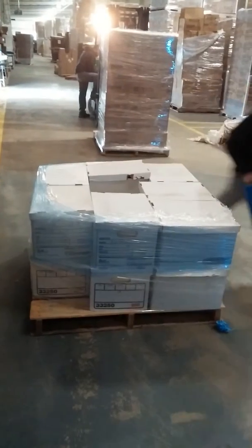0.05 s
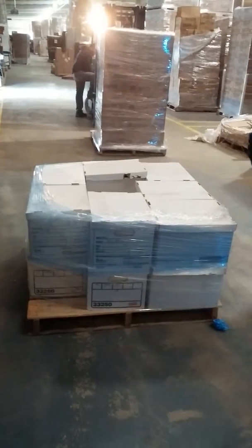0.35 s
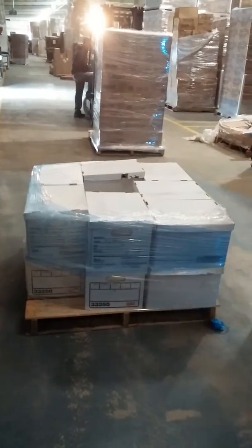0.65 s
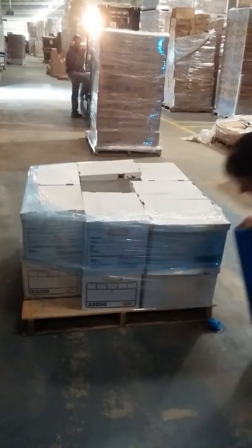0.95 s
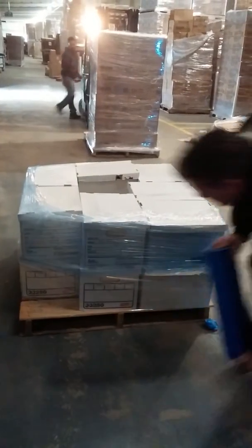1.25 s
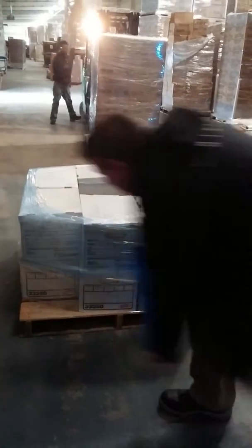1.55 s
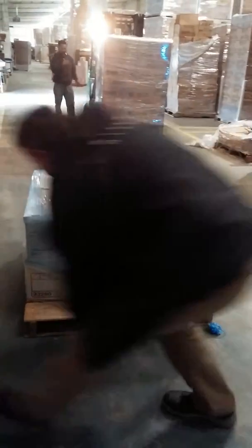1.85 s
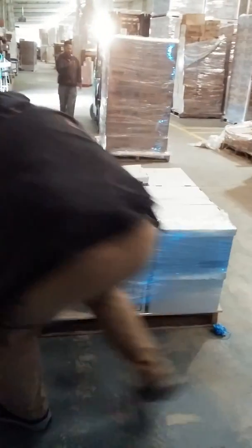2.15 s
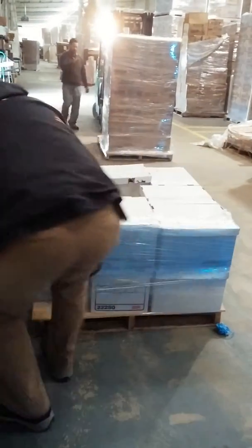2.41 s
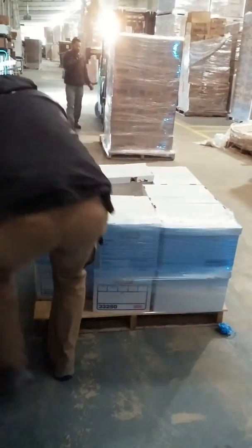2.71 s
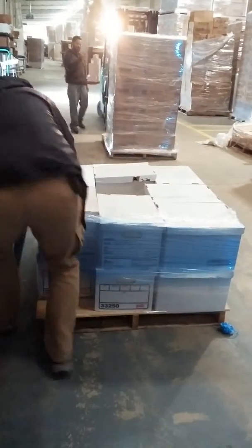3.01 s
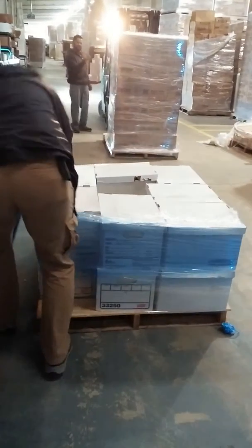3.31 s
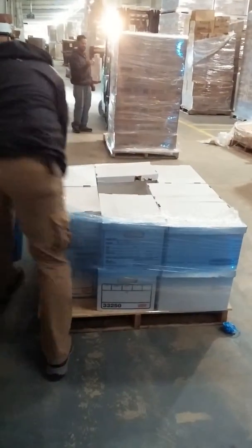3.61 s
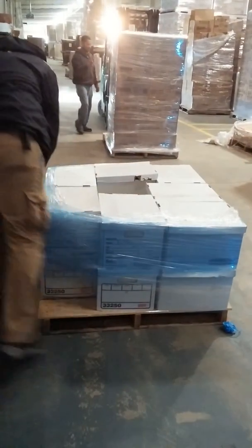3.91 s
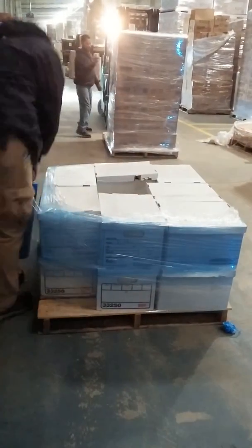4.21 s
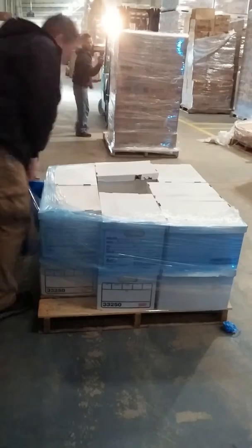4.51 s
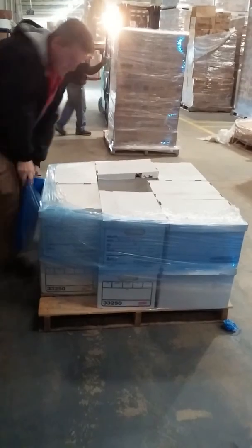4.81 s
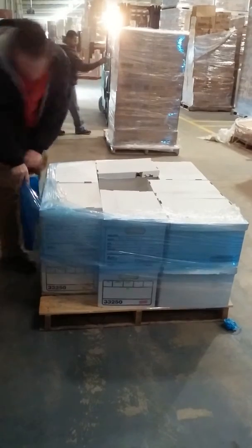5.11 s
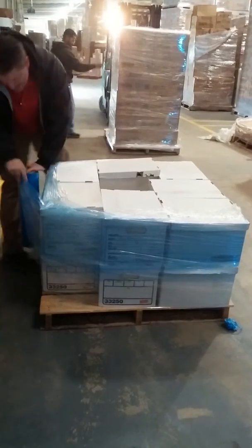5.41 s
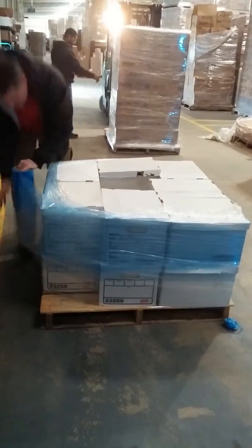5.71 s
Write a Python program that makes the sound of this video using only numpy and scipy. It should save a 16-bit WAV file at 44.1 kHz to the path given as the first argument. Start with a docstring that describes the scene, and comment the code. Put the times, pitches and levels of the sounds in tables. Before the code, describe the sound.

Plastic stretch film tears off a roll right from the start, a loud, dense, crackling rasp that swells and dips as it is drawn around boxes on a pallet. The taut sheet drums underneath, strongest from about 1.1 to 1.9 seconds, with a high squeak near 1.5. Soft boot thuds land on concrete at around 1.3, 2.2 and 2.7 seconds. The pull eases, then rises again near 2.9 with a cluster of rough, gliding squeaks and stops at about 3.4. Short, uneven tugs follow until the end, with sharp snaps, the loudest near 3.7, 4.2 and 5.6 seconds. Hollow cardboard knocks and a few more footfalls come between about 3.9 and 5.1, and brief squeaks return near 5.6 and 5.9. Faint warehouse ventilation rumbles underneath, and the gaps between tugs fall almost quiet. It is heard in stereo from a nearby phone.

```python
"""A warehouse with a concrete floor, ventilation rumbling under the roof, heard on a phone's stereo mics.
A stooping worker walks a roll of stretch film round boxes on a pallet. The tacky film tears off
the roll in a dense stream of tiny slips, and the taut sheet drums like a skin.
One long pull along the front gives way to short tugs at the corner, with snaps and hollow knocks.
Footfalls and squeaks of film over film come through in both."""
import sys
import numpy as np
from scipy import signal
from scipy.fft import rfft, irfft, next_fast_len
from scipy.io import wavfile
from scipy.ndimage import uniform_filter1d, map_coordinates

SR = 44100
rng = np.random.default_rng(int(sys.argv[2]) if len(sys.argv) > 2 else 0)


def to_wav(s):
    """Save 16-bit WAV."""
    ch = np.atleast_2d(s).T  # columns
    pcm = np.round(np.clip(ch, -1, 1) * 32767)  # PCM
    wavfile.write(sys.argv[1], SR, pcm.astype(np.int16))


N = 262395
TIME = np.arange(N) / SR


def amp(db):
    """Decibels to gain."""
    return 10 ** (np.asarray(db) / 20)


def unit(x):
    """x scaled to rms 1."""
    return x / np.sqrt(np.mean(x ** 2) + 1e-20)


def along(points, hz):
    """Rows of (f/Hz, value) interpolated on a log frequency axis."""
    freqs, values = np.transpose(points)
    return np.interp(np.log(hz + 1), np.log(freqs + 1), values)


def curves(rows):
    """One value per sample for each column after the time."""
    times, *columns = np.transpose(rows)
    return [np.interp(TIME, np.maximum.accumulate(times), column) for column in columns]


def filtered(x, response):
    """x through a filter whose gain is response(hz)."""
    size = next_fast_len(N + SR // 4)
    return irfft(rfft(x, size) * response(np.fft.rfftfreq(size, 1 / SR)), size)[..., :N]


def coloured(x, points):
    """x shaped by rows of (f/Hz, level/dB), falling steeply beyond their ends; rms 1."""
    skirts = lambda hz: np.minimum(hz / points[0][0], 1) ** 4 / np.maximum(hz / points[-1][0], 1) ** 4
    return unit(filtered(x, lambda hz: amp(along(points, hz)) * skirts(hz)))


def wander(width_hz):
    """A random complex envelope of rms 1 with a bandwidth of about width_hz."""
    real, imag = unit(filtered(rng.standard_normal((2, N)), lambda hz: 1 / (1 + (hz / width_hz) ** 4)))
    return (real + 1j * imag) / np.sqrt(2)


def struck(start, t60, attack):
    """The envelope of a blow; all times in seconds."""
    age = np.maximum(TIME - start, 0)
    return np.exp(-np.log(1000) * age / t60) * (1 - np.exp(-age / attack))


# Rasp along the front of the pallet, before PULL_GAIN_DB: t/s, level/dB
PULL_RASP = [(0.0, -17.5), (0.03, -15.5), (0.04, -16), (0.1, -15.5), (0.21, -25), (0.24, -20.5),
             (0.31, -18), (0.42, -22), (0.48, -16.5), (0.57, -21), (0.63, -30), (0.86, -19), (0.91, -27),
             (0.94, -27), (0.96, -17.5), (1.08, -14), (1.42, -14.5), (1.61, -13.5), (1.7, -20.5),
             (1.77, -16.5), (1.93, -16), (1.97, -22.5), (2.04, -18.5), (2.31, -28), (2.52, -27.5),
             (2.85, -25), (2.9, -18.5), (3.11, -20), (3.18, -26), (3.25, -21.5), (3.29, -30), (3.39, -42)]
# Low mids of that pull: t/s, level/dB re rasp
PULL_BODY = [(0, -15.5), (0.55, -13), (0.86, -6), (0.98, -16.5), (1.15, -10.5), (1.6, -11), (2.15, -7.5),
             (2.6, -16), (2.8, -4), (2.97, -14.5), (3.25, -14)]
# Its treble: t/s, edge lift/dB, sizzle lift/dB
PULL_TREBLE = [(0, -2, 3.5), (0.33, -8.5, 2.5), (0.65, -2, 3), (0.95, -1.5, 6), (1.17, -2.5, 3.5),
               (1.4, -2.5, -1), (1.95, 0.5, 2.5), (2.2, -1.5, 1.5), (2.5, 4, 4.5), (2.88, -1.5, -1),
               (3.05, 2, 2.5), (3.3, -3.5, -3)]
PULL_GAIN_DB, PULL_STOP_DB_PER_S = 3, 295


def long_pull():
    """The walk along the pallet as one stroke: curves of rasp, body, edge and sizzle in dB."""
    rasp_db = curves(PULL_RASP)[0] + PULL_GAIN_DB + roll_stop_db()
    return [rasp_db, *curves(PULL_BODY), *curves(PULL_TREBLE)]


def roll_stop_db():
    """The long pull dies quickly once the roll stops."""
    return -PULL_STOP_DB_PER_S * np.maximum(TIME - PULL_RASP[-1][0], 0)


def slips(per_second, spread_db):
    """Tiny releases of the tacky film, at random moments and of random sizes."""
    happens = rng.random(N) < per_second / SR
    return happens * rng.choice([-1, 1], N) * amp(spread_db * rng.standard_normal(N))


def slip_stream(per_second, spread_db, direct_db, bounce):
    """Slips reach the mics directly and off the floor, over the wash they raise in the hall; rms 1."""
    samples = np.arange(N)
    direct = unit(slips(per_second, spread_db))
    wash = rng.standard_normal((2, N))
    at_mics = amp(direct_db) * np.array([np.roll(direct, 3), direct]) + wash
    # the echo's delay drifts as the roll is carried up and down
    delay = SR * np.interp(samples, np.linspace(0, N, 24), rng.uniform(.002, .005, 24))
    echo = np.array([map_coordinates(side, [samples - delay], order=0) for side in at_mics])
    return unit(at_mics + bounce * echo)


# Seen from the mics, the roll drifts a little to the right and back: t/s, left minus right/dB
ROLL_PAN = [(0, 0.4), (1.5, -2.4), (3.5, -1), (4.7, 0.5)]
# Four bands of the peeling film, from low mids to top treble: f/Hz, level/dB
BODY_SPECTRUM = [(300, -14.5), (450, -9.5), (560, -10.5), (660, -4), (800, -2), (930, 0.5), (1100, -1.5),
                 (1400, -6)]
RASP_SPECTRUM = [(880, -64.5), (1040, -4.5), (1300, -1.5), (1730, 3), (2250, 1), (2750, 0), (3270, 1.5),
                 (3700, 2.5), (4400, -2.5), (5200, -19)]
EDGE_SPECTRUM = [(4000, -1.5), (4800, 3.5), (5900, 3.5), (7400, 0), (8400, -7.5), (9800, -21.5)]
SIZZLE_SPECTRUM = [(7800, 3), (9000, -1), (10500, -3), (12000, -7), (14000, -3.5), (15800, -5)]
USUAL_PULL_DB, SLACK_DB = -22.5, -58  # rasp of a usual pull, and of film that hangs slack
EDGE_DB, EDGE_PER_DB = -3, -0.12  # level re rasp at a usual pull, change per dB of effort
SIZZLE_DB, SIZZLE_PER_DB = -7.5, -0.32  # likewise


def peel(rasp_db, body_db, edge_lift_db, sizzle_lift_db):
    """Dense slips sound in the whole sheet: thin and bright under a gentle pull, fuller when hard."""
    effort_db = np.maximum(rasp_db, SLACK_DB) - USUAL_PULL_DB
    edge_db = EDGE_DB + EDGE_PER_DB * effort_db + edge_lift_db
    sizzle_db = SIZZLE_DB + SIZZLE_PER_DB * effort_db + sizzle_lift_db
    body = coloured(slip_stream(1500, spread_db=6, direct_db=3, bounce=0.66), BODY_SPECTRUM)
    rasp = coloured(slip_stream(1800, spread_db=1.5, direct_db=-7, bounce=0.35), RASP_SPECTRUM)
    edge = coloured(slip_stream(3800, spread_db=10.5, direct_db=-17.5, bounce=0.3), EDGE_SPECTRUM)
    sizzle = coloured(slip_stream(2100, spread_db=9, direct_db=-14, bounce=0.25), SIZZLE_SPECTRUM)
    bands = body * amp(body_db - 1) + rasp + edge * amp(edge_db) + sizzle * amp(sizzle_db)
    # the peel line catches and lets go; a gentle pull judders more than a hard one
    depth_db = np.interp(rasp_db, [-40, -15], [1.8, 1.05])
    judder = amp(depth_db * (wander(width_hz=210).real + 0.46 * wander(width_hz=42).real))
    pan_db, = curves(ROLL_PAN)
    return bands * judder * amp(rasp_db + np.outer([.5, -.5], pan_db))


def shifting_folds(x, patchy_db, bins=5, frames=30):
    """The folds of the sheet favour some pitches, and different ones as it moves."""
    spectra = signal.stft(x, nperseg=1024)[2]
    patches = rng.standard_normal(spectra.shape) + rng.standard_normal(spectra.shape[1:])
    for _ in range(2):
        patches = uniform_filter1d(patches, bins, axis=1)
        patches = uniform_filter1d(patches, frames, axis=2, mode="wrap")
    gain = unit(amp(patchy_db * unit(patches)))
    return signal.istft(spectra * gain, nperseg=1024)[1][:, :N]


# The free sheet between roll and boxes, drumming in the long pull: t/s, level/dB, f/Hz
SHEET_DRUM = [(0.0, -47, 360), (0.11, -39.5, 344), (0.19, -51, 349.4), (1.05, -45.5, 295.4),
              (1.14, -35.5, 316), (1.28, -30, 272), (1.69, -35, 288.8), (1.83, -32, 249),
              (1.92, -39, 326.7), (2.65, -43, 321), (2.91, -38, 359), (3.16, -53.5, 349.5),
              (3.29, -54, 270), (3.39, -65, 370)]
TUG_DRUM_DB, TUG_DRUM_HZ = -30.5, 270  # the short sheet in a tug: offset from its rasp, pitch
FLUTTER_DB, FLUTTER_HZ = 3, 14  # depth of the wavering in level and pitch


def sheet_drum(tug_db, tug_body_db):
    """The stretched sheet rumbles at its lowest resonance, which moves with its length and tension."""
    pull_db, pull_hz = curves(SHEET_DRUM)
    level = amp(pull_db + roll_stop_db()) + amp(tug_db + tug_body_db / 2 + TUG_DRUM_DB)
    pitch_hz = TUG_DRUM_HZ + (pull_hz - TUG_DRUM_HZ) * amp(roll_stop_db())
    flutter = wander(width_hz=8.98)
    carrier = np.exp(2j * np.pi * np.cumsum(pitch_hz + FLUTTER_HZ * flutter.imag) / SR)
    mid = unit((wander(width_hz=66) * carrier).real)
    flap_spectrum = [(60, -8.5), (130, -1.5), (220, 7.5), (450, 2.5), (600, -2.5)]
    flap = coloured(rng.standard_normal(N), flap_spectrum) * amp(-7.5)
    side = unit((wander(width_hz=170) * carrier).real) * amp(-28)
    return level * amp(FLUTTER_DB * flutter.real + 1.9) * (flap + np.array([mid + side, mid - side]))


def crinkle(rasp_db):
    """Wrinkles pop in the sheet; their level is capped, so a hard pull covers them."""
    age = np.arange(SR // 12) / SR
    pops = slips(per_second=60, spread_db=0) ** 2
    power = np.abs(signal.fftconvolve(pops, amp(-120 * age / 0.022))[:N])  # t60 of 22 ms
    noise = coloured(rng.standard_normal((2, N)), [(1200, 6.5), (3500, -14.5), (8000, 1.5), (15000, 3.5)])
    return unit(np.sqrt(power) * noise) * amp(np.minimum(rasp_db - 7, -44))


# Room tone, rumble from overhead and hiss all round: f/Hz, level/dB
RUMBLE_SPECTRUM = [(20, -12), (38, -16), (60, -7.5), (90, -5), (125, -10), (160, -18.5), (220, -19.5)]
HISS_SPECTRUM = [(150, -7), (500, 16), (2000, -9.5), (15000, -16)]


def ventilation():
    """Ventilation rumbles unevenly up under the roof, louder in the left mic, with a little hiss."""
    rumble = coloured(rng.standard_normal(N) + 0.27 * rng.standard_normal((2, N)), RUMBLE_SPECTRUM)
    swell = amp(5.5 * wander(width_hz=8.2).real)
    hiss = coloured(rng.standard_normal((2, N)), HISS_SPECTRUM)
    return amp([[-52.5], [-55.5]]) * rumble * swell + amp(-65.5) * hiss


# Footfalls beside the pallet: t/s, level/dB
FOOTFALLS = [(1.319, -34.5), (2.225, -38), (2.74, -36), (4.525, -47), (4.791, -34), (5.113, -39.5)]
# Their thud: f/Hz, level/dB
THUD_SPECTRUM = [(35, -20), (70, -9.5), (105, 10), (140, -12), (220, -12)]


def footfalls():
    """Boots thud softly on the concrete slab, centred between the mics."""
    level = sum(amp(db) * struck(start, t60=0.27, attack=0.0066) for start, db in FOOTFALLS)
    return level * coloured(rng.standard_normal(N), THUD_SPECTRUM) * amp(2)


# Film squeaking and creaking over film, and at 3.65 s a short burst of the sheet's drumming: middle t/s,
# length/s, f/Hz, glide/(Hz/s), level/dB
FILM_SQUEAKS = [(1.557, 0.3, 3515, 6, -18.5), (2.83, .2, 522, 7, -33), (2.979, 0.084, 4316, 2000, -17),
                (3.053, 0.14, 3950, 6000, -16.5), (3.116, 0.017, 6090, 4000, -11.5),
                (3.137, .26, 1980, -700, -20.5), (3.223, 0.081, 608, 0, -30), (3.3, 0.34, 1807, -500, -34),
                (3.653, 0.084, 311, 0, -38), (4.15, .071, 1320, -3000, -43),
                (4.598, 0.0091, 3600, 0, -33.5), (4.684, 0.032, 6660, 0, -36),
                (5.575, 0.014, 1120, -13, -23.5), (5.601, 0.091, 1740, 0, -27),
                (5.929, 0.029, 1460, 0, -36.5), (5.935, .06, 2930, 2000, -27)]
SQUEAK_WIDTH_HZ, WIDTH_EXPONENT = 150, 0.52  # roughness at 1 kHz, and how it grows with pitch


def squeaks():
    """For a moment the slips fall into step: a rough, gliding tone, slightly later in the right mic."""
    out = np.zeros((2, N))
    for middle, length, hz, glide, db in FILM_SQUEAKS:
        t = TIME - middle
        carrier = np.exp(2j * np.pi * (hz * t + glide * t * t / 2))
        tone = (wander(SQUEAK_WIDTH_HZ * (hz / 1000) ** WIDTH_EXPONENT) * carrier).real
        swell = np.exp(-(2 * t / length) ** 2)
        out += amp(db) * swell * np.array([tone, np.roll(tone, SR // 300)])
    return out


# Tugs at the pallet's corner:
# full strength t/s, rise/s, hold/s, fall/s, rasp level/dB, body/dB re rasp, treble lift/dB
CORNER_TUGS = [(3.431, 0.065, .01, .13, -38, -12.5, -3), (3.66, .1, 0.013, 0.13, -28, -10, -2),
               (3.739, .04, 0.067, 0.088, -39, -16.5, -3), (3.992, .05, .04, 0.018, -55.5, -5.5, 3),
               (4.097, 0.016, 0.01, 0.15, -23, -26.5, -4), (4.212, 0.09, 0.15, 0.14, -24, -14, -1),
               (4.459, 0.034, 0.0086, 0.032, -33.5, -12, 1),
               (4.251, 0.033, 0.0063, 0.01, -17.5, -16.5, -6.5), (4.552, 0.063, .02, 0.33, -47, -21.5, -11),
               (4.661, .014, 0.091, .08, -52, -16, 9.5), (4.839, .08, 0.0039, 0.063, -37.5, -7, -4.5),
               (4.949, 0.061, 0.029, 0.056, -41, -12, -5.5),
               (5.108, 0.017, .005, 0.086, -35.5, -25.5, -4.5), (5.211, 0.073, 0.004, 0.094, -32, -17, -5),
               (5.293, 0.035, .015, .035, -46, -20, -1), (5.434, 0.022, .005, 0.074, -48.5, -24, 1.5),
               (5.554, 0.02, 0.023, 0.061, -21, -27.5, -0.5), (5.619, .04, 0.043, 0.1, -29, -21.5, -5.5),
               (5.831, .045, 0.016, 0.094, -33, -23, -1), (5.914, .04, 0.022, 0.12, -39.5, -6, -17.5)]
TUG_RANGE_DB, TUG_CURVE = 17.5, 1.15  # level change over a rise or fall, exponent of its slope


def tugs():
    """Each tug is a stroke that rises, holds and falls: rasp, body, edge and sizzle in dB."""
    strokes = []
    for peak, rise, hold, fall, db, body_db, treble_db in CORNER_TUGS:
        off_peak = np.clip(np.maximum((peak - TIME) / rise, (TIME - peak - hold) / fall), 0, 3)
        strokes.append([db - TUG_RANGE_DB * off_peak ** TUG_CURVE, body_db, treble_db, treble_db])
    return strokes


def together(strokes):
    """Overlapping strokes add in power, and the strongest weighs most in the colour."""
    levels, *colours = zip(*strokes)
    powers = [amp(db) ** 2 for db in levels]
    total = sum(powers) + 1e-20
    blended = [sum(power * db for power, db in zip(powers, colour)) / total for colour in colours]
    return [10 * np.log10(total), *blended]


# Film snapping free of an edge: t/s, crack level/dB, spit/dB re crack
FILM_SNAPS = [(3.4102, -31.5, -1), (3.4189, -25.5, -11), (3.725, -18, -4.5), (3.9878, -45, 0),
              (4.2495, -22.5, -20.5), (4.5903, -45.5, -5), (4.666, -46, 1), (4.7497, -31, -14),
              (4.795, -41.5, -3), (5.088, -49.5, 9.5), (5.2108, -26, -15), (5.5854, -22.5, -17.5),
              (5.795, -35, -8.5)]
# The crack at the mics: f/Hz, level/dB
CRACK_SPECTRUM = [(350, 1.5), (700, -9), (1500, 9.5), (2200, 3), (2800, 2), (3700, 5), (4800, -4),
                  (6200, 3), (9000, -23)]


def snaps():
    """A fold lets go with a direct click, then a crack and a spit of treble die among the stacks."""
    crack, spit, click = np.zeros((3, N))
    for start, db, spit_db in FILM_SNAPS:
        crack += amp(db) * struck(start, t60=0.065, attack=0.00059)
        spit += amp(db + spit_db) * struck(start, t60=0.05, attack=0.0002)
        click += amp(db - 6) * struck(start, t60=0.0027, attack=0.0001)
    noise = rng.standard_normal((2, N)) + 1.4 * rng.standard_normal(N)
    return (crack * coloured(noise, CRACK_SPECTRUM)
            + spit * coloured(noise, [(8000, 0), (15000, -2)])
            + click * coloured(noise, [(1500, 22), (15000, 3)]))


# Hollow knocks of roll and boxes, centred: t/s, lowest f/Hz, level/dB, t60/s, overtone lift/dB
BOX_KNOCKS = [(3.949, 350, -35.5, 0.21, -19.5), (4.545, 562, -39.5, 0.043, -3),
              (4.795, 609, -34, 0.33, -2.5), (4.847, 623.5, -43, 0.39, 4), (5.106, 558, -30.5, 0.27, -8)]
# Resonances of the cardboard: multiple of the lowest f, level/dB
CARDBOARD_MODES = [(1, -5), (2.021, -7.5), (2.6, -7), (3.15, -11), (3.849, -8)]


def knocks():
    """Cardboard answers a bump with a dull tap and a few short, fuzzy resonances."""
    rings = np.zeros(N)
    for mode, (multiple, mode_db) in enumerate(CARDBOARD_MODES):
        fuzz = 0.82 + wander(width_hz=97)
        for start, hz, db, t60, overtones_db in BOX_KNOCKS:
            tone = (fuzz * np.exp(2j * np.pi * hz * multiple * TIME)).real
            gain = amp(db + mode_db + overtones_db * (mode > 0))
            rings += gain * struck(start, t60, attack=0.00135) * tone
    tap = coloured(rng.standard_normal(N), [(200, -11), (600, 6), (1400, -12), (3000, -4)])
    tap_level = sum(amp(db + overtones_db / 2 - 6.5) * struck(start, t60=0.13, attack=0.00081)
                    for start, _, db, _, overtones_db in BOX_KNOCKS)
    return rings + tap * tap_level


# How the two microphone ports hear the peel and the drumming: f/Hz, left minus right/dB
PORT_BALANCE = [(60, -1), (92, 1), (140, 2.5), (210, 4.5), (330, 2), (500, 3.5), (770, 14.5), (1170, 5),
                (1790, -1.5), (2740, 4), (4190, 5), (6410, 4.5), (9810, -5.5), (15000, -2.5)]


def scene():
    """The film, the worker and the hall from where the microphones stand."""
    tug_strokes = tugs()
    tug_db, tug_body_db, *_ = together(tug_strokes)
    rasp_db, *colour_db = together([long_pull()] + tug_strokes)
    film = shifting_folds(peel(rasp_db, *colour_db), patchy_db=2) + sheet_drum(tug_db, tug_body_db)
    film = filtered(film, lambda hz: amp(np.outer([.5, -.5], along(PORT_BALANCE, hz))))
    return film + crinkle(rasp_db) + snaps() + squeaks() + knocks() + footfalls() + ventilation()


def noise_suppression(x, threshold_db, range_db):
    """The phone turns the sound down whenever it hears little above the rumble."""
    above_rumble = filtered(x.mean(axis=0), lambda hz: hz > 300)
    level_db = 10 * np.log10(np.abs(uniform_filter1d(above_rumble ** 2, SR // 40)) + 1e-12)
    return x * amp(np.clip(level_db - threshold_db, -range_db, 0))


NOTCH_HZ, NOTCH_WIDTH_HZ, NOTCH_DEPTH = 2758, 85, 0.55
TOP_HZ = 15900


def record(dry):
    """The phone's microphones: port notch, noise suppression, soft overload and band limit."""
    x = filtered(dry, lambda hz: 1 - NOTCH_DEPTH / (1 + ((hz - NOTCH_HZ) / NOTCH_WIDTH_HZ) ** 2))
    x = noise_suppression(x, threshold_db=-44, range_db=23)
    x = x / (1 + np.abs(x) ** 6) ** (1 / 6)
    return filtered(x, lambda hz: hz < TOP_HZ)


dry = scene()
out = record(dry)
to_wav(out)
```